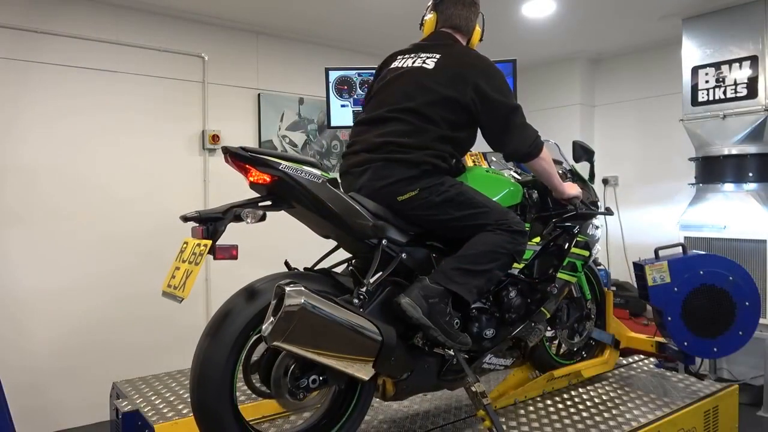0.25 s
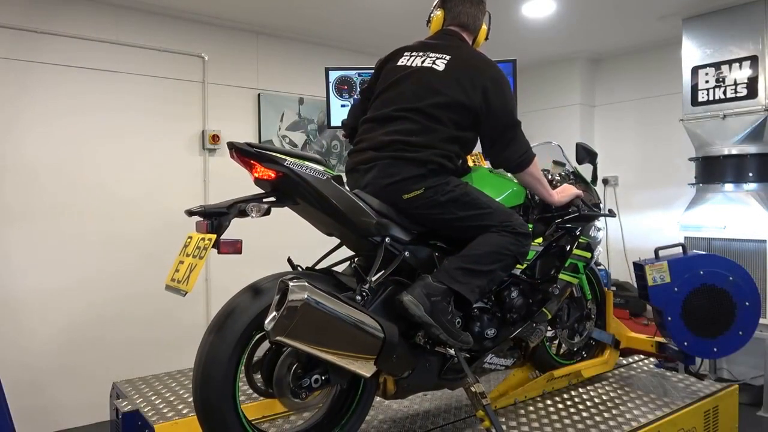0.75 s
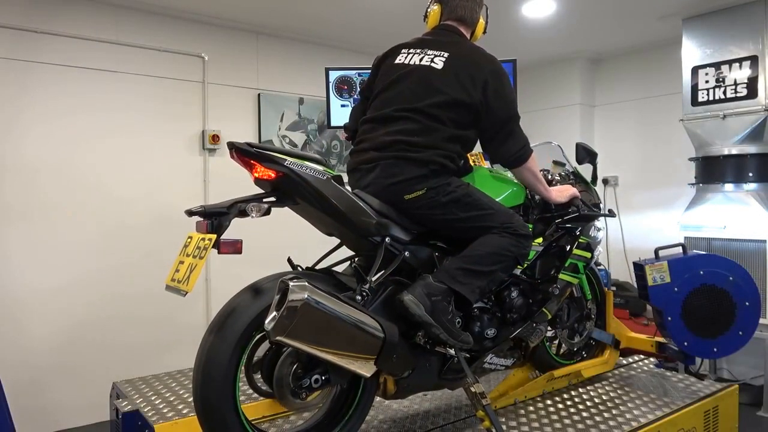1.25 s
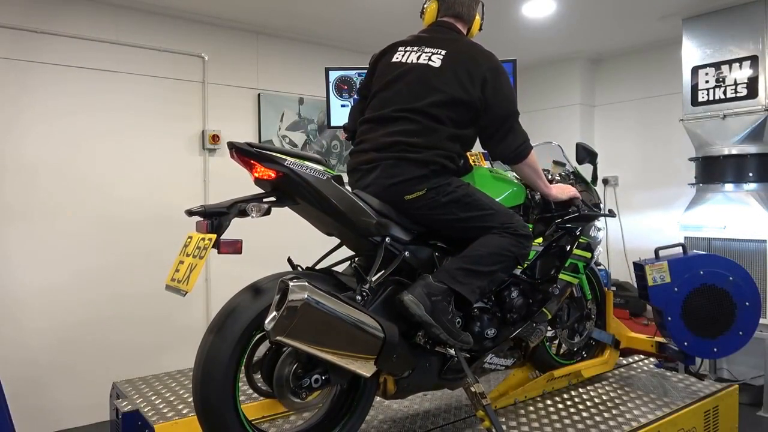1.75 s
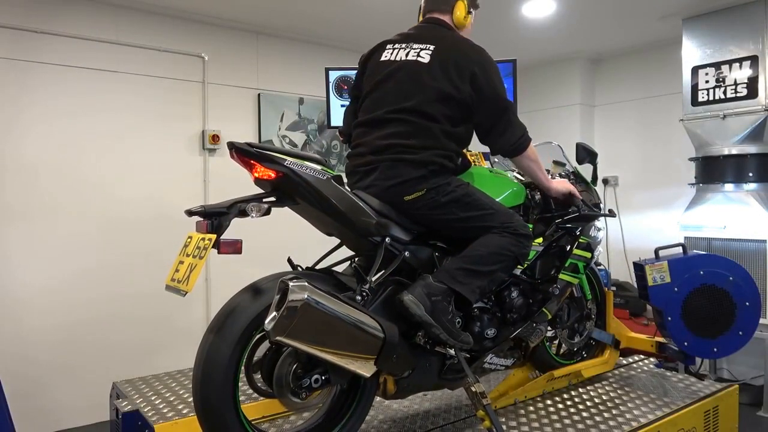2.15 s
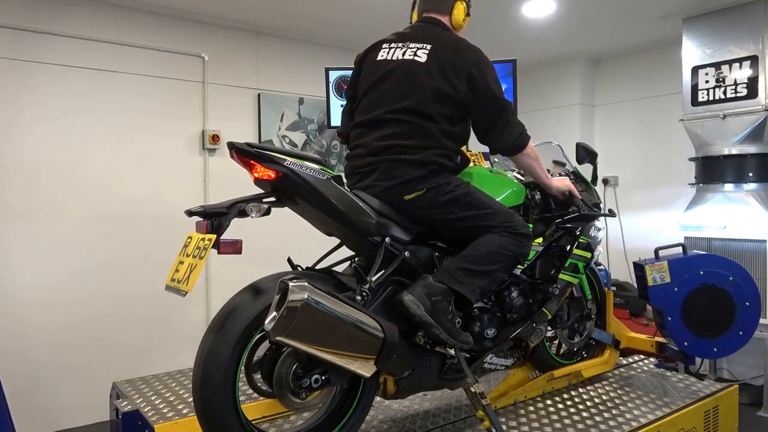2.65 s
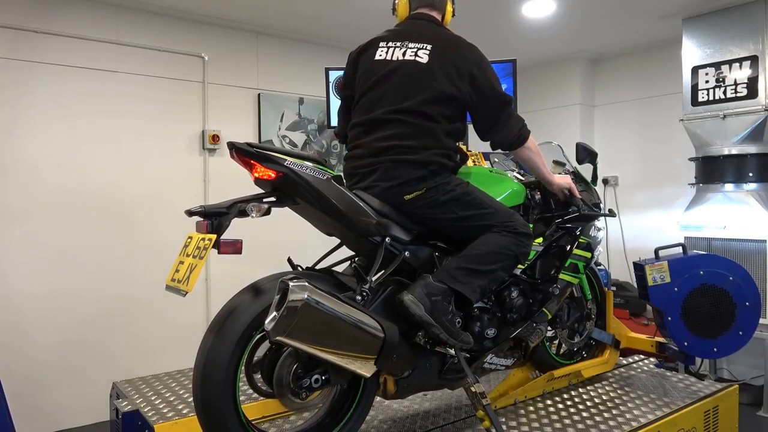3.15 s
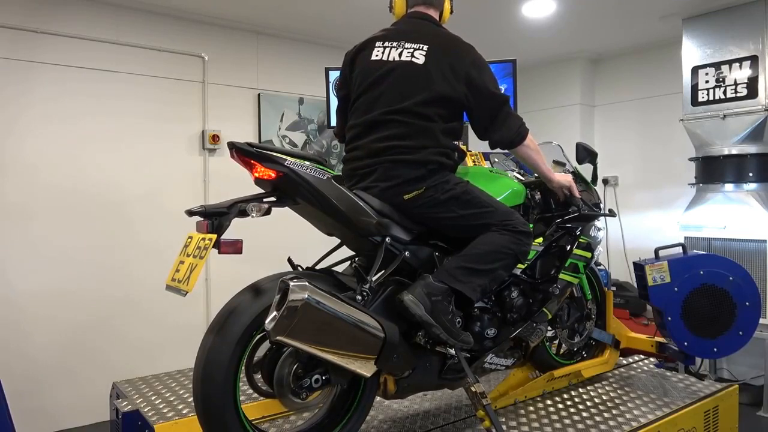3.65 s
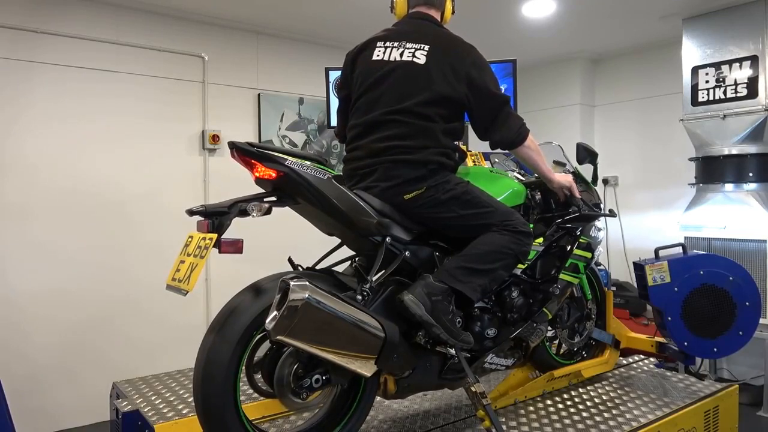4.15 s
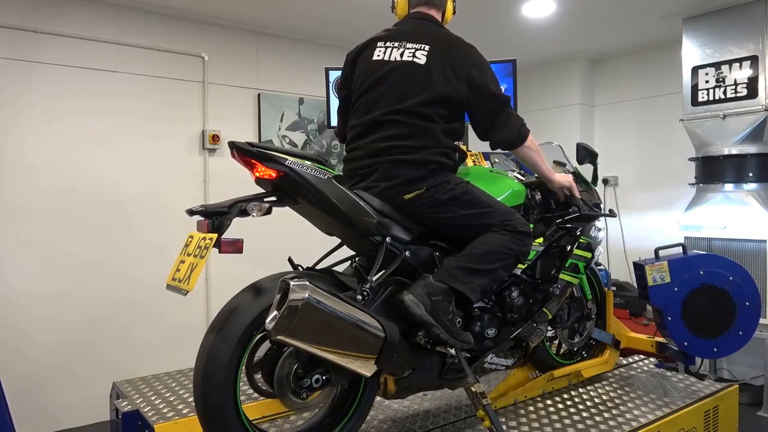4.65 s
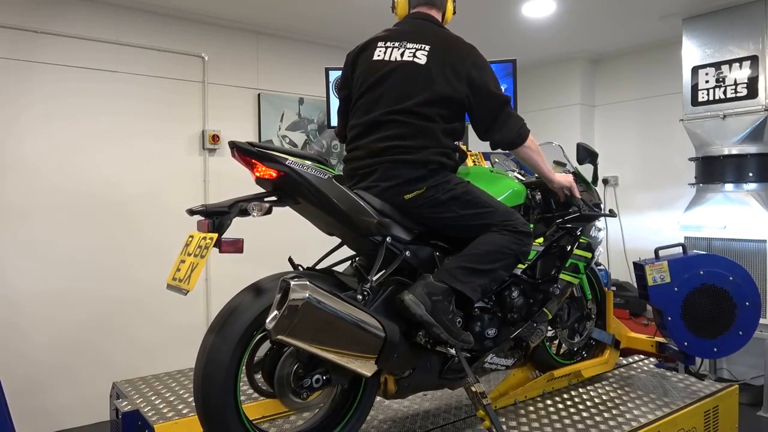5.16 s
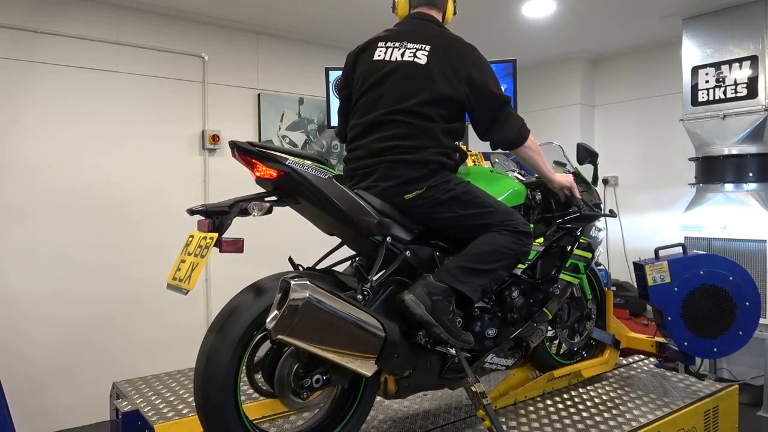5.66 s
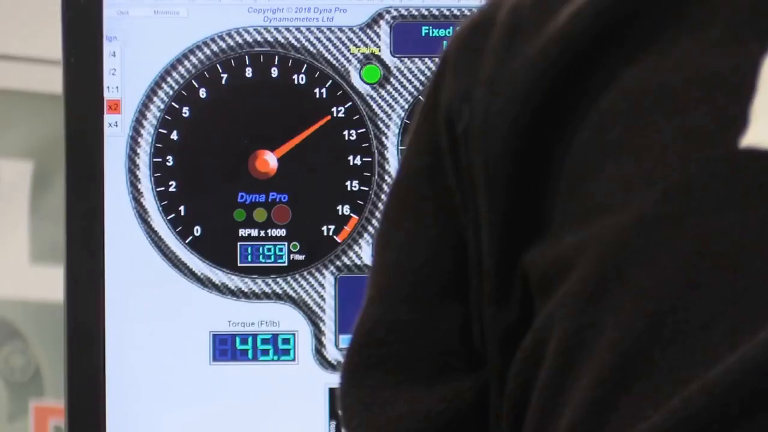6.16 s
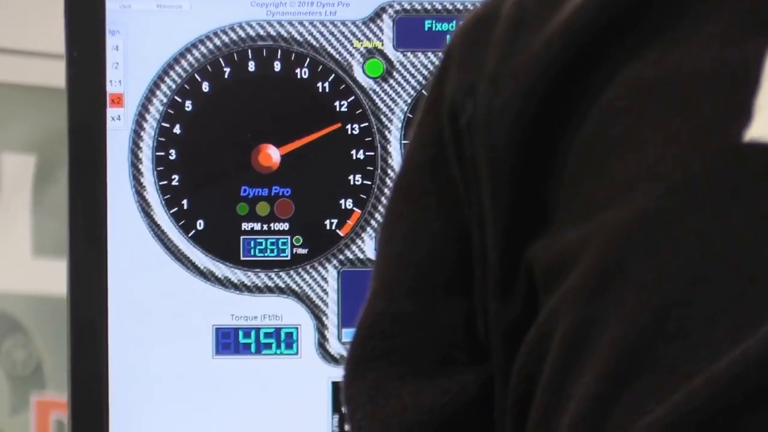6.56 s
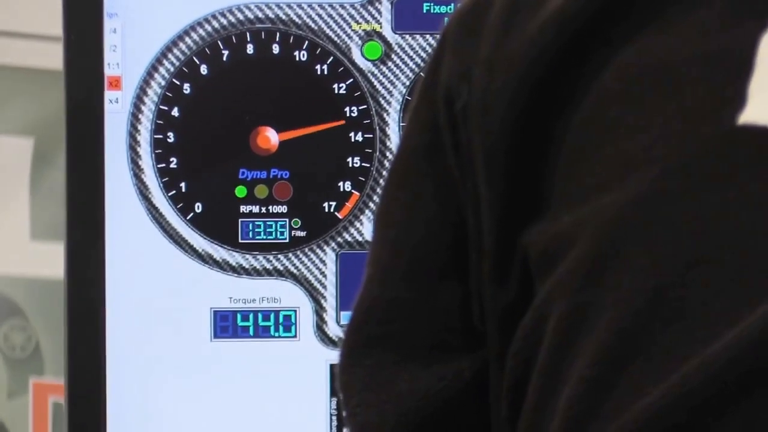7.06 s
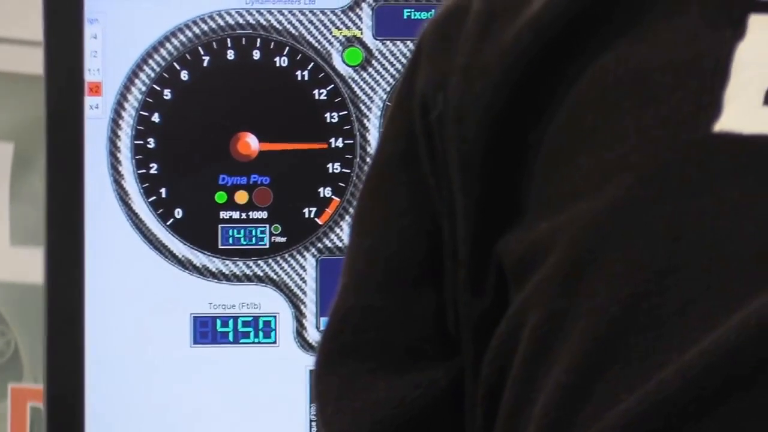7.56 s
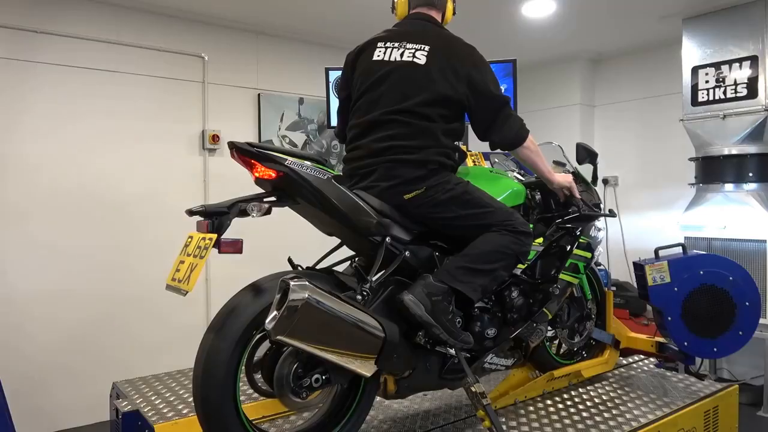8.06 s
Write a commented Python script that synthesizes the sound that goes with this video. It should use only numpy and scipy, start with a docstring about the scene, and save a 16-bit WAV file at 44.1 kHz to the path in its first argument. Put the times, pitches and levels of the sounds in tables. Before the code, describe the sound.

Full-throttle motorcycle run on rollers indoors: raspy exhaust climbs continuously to a howl, with clattering valves, chain whine and a fading blower drone.

```python
"""A four-cylinder sport motorcycle on a dynamometer in a small workshop, heard by two close-spaced microphones.
At first a cooling blower drones under a ragged engine at about 3200 rpm: gas rasps, valve gear clatters, air hisses.
At full throttle the exhaust lines climb, swelling and dipping at the pitches of the room; the chain whines.
The treble dips at high revs, from 5 s on with low thuds; the blower's drone fades under the growing engine, and
the run ends at about 15000 rpm. One crank angle drives the exhaust lines, the pulsing noise and the chain."""
import sys
import numpy as np
from scipy import signal
from scipy.fft import rfft, irfft, next_fast_len
from scipy.io import wavfile

SR = 44100
rng = np.random.default_rng(int(sys.argv[2]) if len(sys.argv) > 2 else 0)


def file_out(sig):
    """Save sig as 16-bit WAV at sys.argv[1]."""
    # one column per channel
    cols = np.atleast_2d(sig).T
    # limit, then scale
    lim = np.clip(cols, -1, 1)
    pcm = np.round(lim * 32767).astype(np.int16)
    wavfile.write(sys.argv[1], SR, pcm)


N = 366912
LEFT_RIGHT = np.array([[.5], [-.5]])  # splits a difference evenly between the two channels


def from_db(db):
    """Decibels to gain."""
    return 10 ** (np.asarray(db) / 20)


def rms_one(x):
    """Scale to unit power."""
    return x / np.sqrt(np.mean(x ** 2) + 1e-20)


def in_time(rows):
    """The columns of a time table, interpolated at every sample."""
    times, *columns = np.transpose(rows)
    return [np.interp(np.arange(N) / SR, times, column) for column in columns]


def at_hz(points, hz):
    """Read a table on a log-frequency axis."""
    table_hz, values = np.array(points).T
    return np.interp(np.log(np.maximum(hz, 1)), np.log(table_hz), values)


def drift(rate_hz):
    """Slow random wander of rms 1: noise through two equal low-pass poles at rate_hz."""
    step = 40  # samples between the points of the wander
    pole = np.exp(-2 * np.pi * rate_hz * step / SR)
    white = rng.standard_normal(N // step + 2002)
    slow = signal.lfilter([1], [1, -2 * pole, pole * pole], white)[2000:]  # skip the filter's start
    return np.interp(np.arange(N) / step, np.arange(len(slow)), rms_one(slow))


def swell_shape(centre_s, length_s):
    """A smooth swell and fall, one half at either end of its length."""
    offset = 2 * (np.arange(N) / SR - centre_s) / length_s
    return .5 ** np.minimum(offset ** 2, 60)


def colour(x, spectrum):
    """Filter by a smooth spectrum."""
    size = next_fast_len(N + SR // 10)
    gain = from_db(at_hz(spectrum, np.fft.rfftfreq(size, 1 / SR)))
    return irfft(rfft(x, size) * gain, size)[..., :N]


# how alike a reverberant field is at the two microphones: (frequency [Hz], left-right likeness [0-1])
LIKENESS = [(40, 0.48), (120, 0.58), (400, 0.82), (1000, 0.54), (2500, 0.7), (5000, 0.57), (9000, 0.47),
            (12000, 0.96)]


def diffuse(size):
    """Stereo white noise as a reverberant field reaches two close microphones."""
    padded = next_fast_len(size)
    mid, side = rfft(rng.standard_normal((2, padded)))
    alike = np.clip(at_hz(LIKENESS, np.fft.rfftfreq(padded, 1 / SR)), 0, 1)
    side = side * np.sqrt((1 - alike) / (1 + alike))
    return irfft(mid + side * [[1], [-1]], padded)[:, :size]


def noise(spectrum):
    """Coloured stereo noise, rms 1."""
    return rms_one(colour(diffuse(N), spectrum))


ROOM_T60_S = .48  # time for the reverberation to fall by 60 dB


def reflections(x):
    """Dense stereo reverberation off bare walls, at the power of its source."""
    t = np.arange(SR // 2) / SR
    tail = diffuse(len(t)) * from_db(-60 * t / ROOM_T60_S) * (t > .003)  # first reflection after 3 ms
    return signal.fftconvolve(x[None], rms_one(tail) / np.sqrt(len(t)), axes=1)[:, :N]


def workshop(x, wet_db):
    """Direct sound plus reflections, at unchanged power."""
    wet = from_db(wet_db)
    return (x + wet * reflections(x)) / np.sqrt(1 + wet ** 2)


def bell(hz, centre, width):
    """Shape of a narrow resonance, 1 at its centre."""
    return 1 / (1 + (2 * (hz - centre) / width) ** 2) ** 2


# standing waves of the room, added in power to the direct line:
# (frequency [Hz], width [Hz], lift [dB], left over right [dB])
ROOM_MODES = [(111.7, 14.5, 9.5, -2), (135.3, 3.6, 14, -2.5), (153, 20, 12.5, 5), (173.5, 13, 12.5, -2),
              (196.5, 12.7, 15, 1.5), (240, 44, 17, 1.5), (263.6, 5.9, 19.5, -3), (274.8, 6.7, 16, -5),
              (283.3, 10.4, 15.5, 0), (299, 26, 12, -3.5), (324, 7.1, 13, 2), (344, 7.5, 15, -4),
              (364.7, 11.4, 6, 9.5), (377.7, 13, 6, 0.5), (395, 12.6, 3.5, 12), (408, 4.1, 7, 1),
              (423.9, 8.5, 9, -1.5), (442, 16, 7.5, 4), (457, 8.2, 5.5, -1), (476.6, 25, 4.5, 15),
              (515.5, 39, 12.5, -0.5), (537.6, 6.9, 11.5, 12), (593, 84, 3.5, 18), (623, 26, 8, -3),
              (775, 2.8, 10, -2), (877, 120, 1, -8), (907, 20, 7, 5.5), (929, 14, 5.5, 10),
              (940, 9.3, 11.5, 0)]


def standing_waves(hz):
    """Left and right gain where the room's standing waves lift a line passing through the given pitches."""
    grid = np.arange(0, 1600, .25)
    power = 1
    for centre, width, lift_db, pan_db in ROOM_MODES:
        power = power + from_db(lift_db + pan_db * LEFT_RIGHT) ** 2 * bell(grid, centre, width)
    return np.array([np.interp(hz, grid, side) for side in np.sqrt(power)])


# pitches at which the reflections cancel at the microphones: (frequency [Hz], width [Hz], depth [dB])
ROOM_NULLS = [(124.2, 2.4, 20), (129.3, 1.6, 10), (159.5, 3, 22), (186.1, 1.6, 7), (205.8, 2.8, 24),
              (228.2, 1.8, 8), (245.2, 4, 24), (257, 2.6, 9), (290.5, 4, 8), (310.3, 3.2, 20),
              (333, 3.0, 18), (354.8, 3.4, 17), (373.4, 2.5, 23), (387.8, 2.2, 18), (402.5, 2.5, 5),
              (410.3, 2.6, 24), (432.5, 3.4, 22), (445.6, 3.5, 20), (470.6, 2.4, 18), (491.0, 1.7, 14),
              (502, 2.5, 7), (534, 4, 8), (555, 4, 14), (575, 3.5, 20), (597.6, 2.5, 14), (606, 2.5, 10),
              (619, 3, 20), (802, 6, 12), (866, 7, 12), (902, 4, 5), (938, 7, 13), (970, 8, 16)]


def cancellation(hz):
    """Gain of a line at the given pitches: it dips wherever the reflections cancel."""
    grid = np.arange(0, 1600, .25)
    depth_db = sum(db * bell(grid, centre, width) for centre, width, db in ROOM_NULLS)
    return np.interp(hz, grid, from_db(-depth_db))


# cooling-fan air, relative spectrum: (frequency [Hz], level [dB per Hz])
BLOWER = [(20, -32), (45, -23), (80, -10), (130, -7), (250, 3), (400, 25), (1000, 18), (1400, 14),
          (4000, -49)]
# blade tones at their opening level: (frequency [Hz], level [dB])
BLADES = [(336, -30.5), (670, -34.5), (1002, -40)]
# the blower's drone fades under the growing engine: (time [s], level [dB])
BLOWER_LEVEL = [(0, 0), (2.8, -2), (4, -6), (5.6, -9.5), (6.6, -15), (8.32, -20)]


def blower(air_db=-36.0, pan_db=-1.5):
    """The cooling fan: steady air noise and wavering blade tones, fading under the growing engine."""
    t = np.arange(N) / SR
    tones = 0
    for hz, db in BLADES:
        tone = np.sqrt(2) * np.sin(2 * np.pi * hz * t + .9 * drift(6))
        tones = tones + from_db(db) * tone * (1 + 0.35 * drift(24))
    level_db = in_time(BLOWER_LEVEL)[0] + pan_db * LEFT_RIGHT
    return (tones + from_db(air_db) * noise(BLOWER)) * from_db(level_db)


# the engine is ragged at low revs and smooths out as it climbs: (time [s], roughness [0-1])
ROUGHNESS = [(0, 1), (1.8, .8), (3, .55), (5, .35), (6.5, .32), (8.32, .3)]


def raggedness():
    """How unsteadily the engine runs, at every sample; it scales the random wander of pitch and level."""
    return in_time(ROUGHNESS)[0]


# the steady lines at the tailpipe, before the room: each (time [s], level [dB])
# at the rate of the crankshaft itself, twice per four-stroke cycle
CRANK_LINE = [(0, -60), (1.2, -63), (2, -56), (2.8, -64), (3.8, -65), (4.4, -59), (5.4, -55), (6.3, -61),
              (7, -56.5), (7.5, -58.5), (8.32, -60)]
# at the firing rate, four times per cycle, as the pipe comes in and out of tune
FIRING_LINE = [(0, -39), (1, -35), (3.1, -40.5), (3.55, -43), (4.4, -28), (4.85, -29), (5.2, -24),
               (6.6, -23.5), (7.1, -33.5), (8.32, -32)]
# five, six and seven times per cycle
FIFTH_LINE = [(0, -70), (3.65, -61), (3.93, -39), (4.15, -43), (4.7, -39), (5.15, -37.5), (5.6, -50),
              (6.2, -44), (6.9, -35), (7.4, -36.5), (8, -33.5), (8.32, -31.5)]
SIXTH_LINE = [(0, -69), (2.8, -46), (3.7, -41), (4, -33.5), (4.8, -36.5), (5.6, -49.5), (8.32, -41.5)]
SEVENTH_LINE = [(0, -75), (2.2, -42), (3, -43), (3.6, -51), (4.3, -47), (5.4, -44), (5.85, -32),
                (6.9, -28.5), (7.55, -45), (7.9, -34), (8.05, -44), (8.32, -39)]
# an octave and a twelfth above the firing rate
OCTAVE_LINE = [(0, -51.5), (.8, -41.5), (1.22, -39), (1.44, -26), (1.7, -29), (2.05, -34), (2.4, -39),
               (3.65, -40), (4.1, -39), (5.7, -34.5), (6.6, -26), (7.25, -25), (7.75, -30), (8.1, -38),
               (8.32, -35)]
TWELFTH_LINE = [(0, -38), (1.3, -42), (1.7, -39), (2, -42), (2.5, -38.5), (3.6, -38), (4, -34), (4.6, -34),
                (5, -41), (5.7, -31), (6.3, -35), (6.65, -27.5), (7, -33), (7.5, -33), (7.8, -44),
                (8.32, -33)]
# the steady lines together: (multiple of the cycle rate, its level curve)
STRONG_LINES = [(2, CRANK_LINE), (4, FIRING_LINE), (5, FIFTH_LINE), (6, SIXTH_LINE), (7, SEVENTH_LINE),
                (8, OCTAVE_LINE), (12, TWELFTH_LINE)]
# single lines ring out as they sweep upward: (time [s], length [s], multiple of the cycle rate, level [dB])
SURGES = [(.04, .05, 12, -24), (.17, .1, 12, -24.5), (.38, .09, 12, -22), (.52, .12, 16, -23),
          (.65, .08, 10, -26), (.86, .15, 8, -21), (.88, .1, 10, -26.5), (1.06, .09, 10, -26.5),
          (1.28, .08, 12, -24), (1.45, .09, 12, -23.5), (1.77, .1, 8, -20.5), (1.95, .11, 8, -21),
          (2.16, .08, 8, -24.5), (2.32, .09, 8, -22.5), (2.51, .08, 8, -20.5), (2.78, .08, 8, -25),
          (2.8, .12, 11, -25), (2.95, .13, 8, -20), (2.97, .15, 11, -26.5), (3.1, .07, 16, -26),
          (3.18, .1, 8, -19.5), (3.21, .08, 16, -26), (3.34, .22, 11, -23), (3.39, .1, 8, -21.5),
          (3.54, .08, 8, -19), (3.63, .12, 8, -19.5), (3.6, .06, 12, -26), (3.74, .08, 14, -26),
          (3.98, .08, 12, -24.5), (4.05, .11, 16, -25.5), (4.26, .12, 12, -25), (4.42, .1, 14, -28),
          (4.73, .12, 6, -28), (4.74, .09, 8, -26), (4.86, .1, 14, -27), (4.81, .13, 7, -24.5),
          (4.96, .14, 7, -25.5), (5.19, .13, 7, -24), (5.67, .09, 10, -25), (5.85, .09, 10, -26.5),
          (5.96, .09, 8, -21.5), (6.92, .14, 10, -26.5), (7.55, .14, 10, -29), (6.89, .16, 5, -24.5),
          (7.08, .07, 16, -26.5), (7.29, .12, 5, -26), (7.41, .12, 8, -21), (7.63, .15, 5, -23.5),
          (7.88, .2, 14, -28)]
# scattered reflections in the steady lines: (frequency [Hz], level against the direct sound [dB])
SCATTER = [(120, -20), (350, -15), (500, -7), (700, -2), (900, -5), (1200, 1)]


def exhaust_note(cycle, cycle_hz, rough=.19, wobble_rad=.035, spread_rad=.45):
    """Strong clean lines lifted and cancelled by the room as their pitches cross it; some surge briefly."""
    roughness = raggedness()
    out, steady = 0, dict(STRONG_LINES)
    for multiple in sorted(set(steady) | {row[2] for row in SURGES}):
        hz = multiple * cycle_hz
        phase = multiple * (2 * np.pi * cycle + wobble_rad * roughness * drift(25))
        # reflections bring each line to the two microphones slightly out of step
        tone = np.sqrt(2) * np.sin(phase + spread_rad * drift(0.78) * LEFT_RIGHT)
        gain = sum(from_db(db) * swell_shape(s, length) for s, length, k, db in SURGES if k == multiple)
        scattered = 0
        if multiple in steady:
            wet = from_db(at_hz(SCATTER, hz))
            tailpipe = from_db(in_time(steady[multiple])[0])
            direct = tailpipe * standing_waves(hz) / np.sqrt(1 + wet ** 2)
            scattered = direct * wet * reflections(tone.mean(axis=0))
            gain = np.hypot(gain, direct)
        flickering = gain * tone * (1 + rough * roughness * drift(13.4))
        out = out + (flickering + scattered) * cancellation(hz)
    return out


# the weaker exhaust lines, firing harmonics and those between, relative:
# (multiple of the cycle rate, level [dB])
CYCLE_LINES = [(1, -52), (3, -48), (9, -37.5), (10, -37), (11, -35.5), (13, -36), (14, -35.5), (15, -35.5),
               (16, -35.5), (17, -37), (18, -38), (19, -38.5), (20, -35), (21, -39.5), (22, -39), (23, -40),
               (24, -37.5), (26, -41.5), (28, -40), (30, -40), (31, -44), (32, -41), (33, -43.5), (34, -42),
               (36, -42), (42, -44), (64, -55)]
# (time [s], level of those lines [dB], odd multiples against even ones [dB])
BARK = [(0, -3.5, -5), (1.5, -4.5, -5), (2.4, -.5, -3), (3.2, 2, -2), (4, 2, -4), (4.8, 2.5, -1.5),
        (5.5, 1.5, -2), (6.2, 2, -3), (6.9, 3.5, -3), (7.6, 3.5, -2.5), (8.32, 4.5, -2)]
# what the silencer lets through: (frequency [Hz], gain [dB])
SILENCER = [(40, -34), (70, -14), (120, -2), (160, -5), (210, -10), (255, 4.5), (310, 7.5), (430, 0),
            (570, 2.5), (680, 3), (800, 0), (950, -1), (1120, -1), (1400, -3), (1750, -1), (2150, -.5),
            (2900, -4.5), (3600, -5.5), (4500, -10)]


def exhaust_bark(cycle, rough=.25, surge_db=2.2, jitter_cycles=.008):
    """The weaker exhaust lines, firing harmonics and those between; each of four groups surges on its own."""
    level_db, odd_db = in_time(BARK)
    roughness = raggedness()
    size, multiples = 4096, np.arange(65)  # samples in one stored cycle; its harmonics
    levels = from_db(np.interp(multiples, *np.transpose(CYCLE_LINES)))
    lines = levels * np.exp(2j * np.pi * rng.random(len(multiples)))
    lines[[0] + [multiple for multiple, _ in STRONG_LINES]] = 0  # these sound in exhaust_note
    place = (cycle + jitter_cycles * roughness * drift(10)) % 1 * size
    pulses = 0
    for group in range(4):
        # every fourth multiple shares one random surge
        wave = irfft(lines * (multiples % 4 == group), size) * size / np.sqrt(2)
        surge = rms_one(from_db(surge_db * drift(8.5)))
        group_gain = from_db(level_db + odd_db * (group % 2))
        pulses = pulses + np.interp(place, np.arange(size), wave) * surge * group_gain
    rough_pulses = pulses * (1 + rough * roughness * drift(80))
    return workshop(colour(rough_pulses, SILENCER), wet_db=2.0)


def throb(cycle, depth, uneven):
    """Puffs at all four firings of a cycle, stronger once per cycle; unit power."""
    return rms_one(np.exp(depth * np.cos(8 * np.pi * cycle) + uneven * np.cos(2 * np.pi * cycle)))


# the treble dips at high revs, from 5 s on with low thuds; the first dips almost without one:
# (time [s], length [s], thud level [dB], treble dip [dB])
GUSTS = [(4.528, 0.076, -64, 3), (5.018, 0.1, -38, 6), (5.468, 0.18, -43, 7.5), (6.128, .12, -44, 6.5),
         (6.66, 0.13, -40, 0.5), (6.975, 0.12, -35.5, 1), (7.21, 0.13, -38.5, .5), (7.42, 0.13, -41, 1.8),
         (7.73, 0.12, -39.5, 1), (8.32, 0.087, -40, 2)]
# valve gear and air, before the dips and each source's trim: (time [s], clatter level [dB], hiss level [dB])
MACHINE_LEVEL = [(0, -23.5, -41.5), (.25, -24, -36), (1.15, -25.5, -35), (1.8, -28.5, -36),
                 (2.4, -27.5, -33.5), (3.5, -27, -30.5), (4.3, -30, -33.5), (4.85, -31, -32.5),
                 (6.4, -28, -31.5), (7.3, -30, -32), (8.32, -27.5, -28.5)]


def machine_levels():
    """Clatter and hiss levels in dB, with the brief dips at high revs."""
    dip_db = sum(dip * swell_shape(s, length) for s, length, _, dip in GUSTS)
    return [level_db - dip_db for level_db in in_time(MACHINE_LEVEL)]


# turbulent gas, before flutter: (time [s], level [dB])
RASP_LEVEL = [(0, -24.5), (.6, -23.5), (1.5, -29), (2.5, -28), (3.5, -30.5), (4.5, -33), (5.5, -36),
              (6.5, -37.5), (7.4, -39), (8.32, -42)]
# relative spectra of gas, valve gear, and intake and tyre: each (frequency [Hz], level [dB per Hz])
RASP = [(60, -44), (150, -17.5), (240, 0.5), (340, -9), (480, 3), (680, -2.5), (830, -3), (1000, -1.5),
        (1400, -4), (2200, -49), (5000, -91)]
CLATTER = [(300, -50), (650, -1.5), (1000, 1), (1250, 3), (1500, 5.5), (2000, 5), (2500, 1.5), (3200, -5.5),
           (4500, -11.5), (8000, -36)]
HISS = [(1500, -13), (3000, 0), (3900, -0.5), (4800, 0), (5700, -2), (6800, -3), (7350, -3), (8000, -6.5),
        (10000, -8.5), (12000, -11.5), (13800, -14.5), (15000, -36), (16000, -35)]


def engine_noise(cycle, clatter_db=1.5, hiss_db=2.5, flutter_db=3.0, waver_db=0.6, pan_db=-1.5):
    """Turbulent gas, valve gear and the hiss of intake and tyre, pulsing with the engine, wavering together."""
    rasp_level, = in_time(RASP_LEVEL)
    clatter_level, hiss_level = machine_levels()
    flutter = flutter_db * raggedness() * drift(17)
    rasp = from_db(rasp_level + flutter) * noise(RASP) * throb(cycle, depth=.4, uneven=.2)
    clatter = from_db(clatter_level + clatter_db) * noise(CLATTER) * throb(cycle, depth=.2, uneven=.1)
    hiss = from_db(hiss_level + hiss_db) * noise(HISS) * throb(cycle, depth=0.032, uneven=0.037)
    panned = (rasp + clatter) * from_db(pan_db * LEFT_RIGHT)
    return (panned + hiss) * from_db(waver_db * drift(14))


LINKS_PER_CYCLE = 9.875  # chain links meeting the sprocket in one four-stroke cycle
# links meeting the sprocket, relative: (multiple of the mesh rate, level [dB])
CHAIN = [(3, -34), (4, -37), (5, -37.5), (6, -39.5), (7, -38.5), (8, -38)]
# how hard the links strike: (time [s], level [dB])
CHAIN_LOAD = [(0, -6), (2, -3), (4, 0), (5, -1), (5.9, 1.5), (6.6, -1), (7.3, -4.5), (8.32, -6)]
# ringing of chain and sprocket: (frequency [Hz], gain [dB])
SPROCKET = [(1000, -8), (2400, -12), (3000, -7), (3400, 0), (3620, 0), (3800, -5), (4050, 0), (4400, -6),
            (4600, .5), (4800, 2), (5100, -9), (5400, -10), (6200, -16), (6800, -7), (7300, -4),
            (7900, -15), (10000, -24)]


def chain(cycle, slack_rad=0.4, whine_db=29.5):
    """The chain whines at multiples of its mesh rate; slack smears the lines and the level follows the hiss."""
    mesh = 2 * np.pi * LINKS_PER_CYCLE * cycle + slack_rad * drift(8.6)
    whine = sum(from_db(db) * np.sqrt(2) * np.sin(round(k) * mesh) for k, db in CHAIN)
    _, hiss_level = machine_levels()
    level_db = hiss_level + in_time(CHAIN_LOAD)[0] + whine_db
    return workshop(colour(whine, SPROCKET), wet_db=1.5) * from_db(level_db)


# low exhaust thud, relative spectrum: (frequency [Hz], level [dB per Hz])
THUD = [(20, -22), (50, -28), (78, 7.5), (115, 11.5), (170, 5), (300, -17.5)]


def gusts(between_db=-63.0):
    """Low thuds of the exhaust stream at high revs: swells of low noise over a faint rumble."""
    swell = sum(from_db(db) * swell_shape(s, length) for s, length, db, _ in GUSTS)
    return (swell + from_db(between_db)) * noise(THUD)


START_HZ = 105.3  # firing rate at the start
# how fast the firing rate climbs as the engine winds up the roller: (time [s], climb [Hz per s])
CLIMB = [(0, 34.7), (1, 41.5), (1.8, 41.3), (3, 46.4), (3.6, 52.3), (6.3, 56.8), (7.4, 45.2), (8.32, 34.7)]


def scene():
    """One crankshaft angle drives every part of the motorcycle; one four-stroke cycle is four firings."""
    firing_hz = START_HZ + np.cumsum(in_time(CLIMB)[0]) / SR
    cycle_hz = firing_hz / 4
    cycle = np.cumsum(cycle_hz) / SR
    exhaust = exhaust_note(cycle, cycle_hz) + exhaust_bark(cycle)
    machine = engine_noise(cycle) * from_db([[-.3], [.3]]) + chain(cycle)
    return blower() + exhaust + machine + gusts()


CUTOFF_HZ = 15600  # top of the microphone signal's band


def record(dry, knee=0.8):
    """The highest peaks are rounded and the top of the band is cut."""
    rounded = dry / (1 + (dry / knee) ** 4) ** .25
    band_limit = signal.ellip(10, .05, 70, CUTOFF_HZ, fs=SR, output="sos")
    return signal.sosfiltfilt(band_limit, rounded)


dry = scene()
out = record(dry)
file_out(out)
```